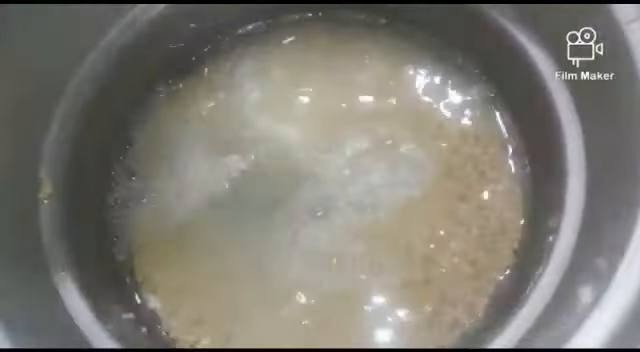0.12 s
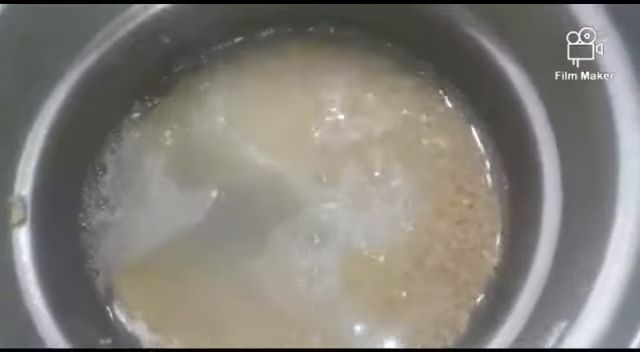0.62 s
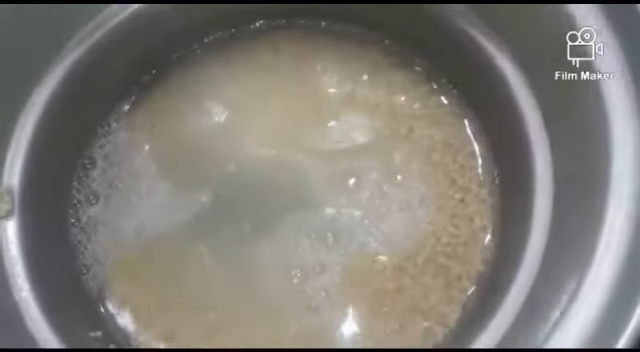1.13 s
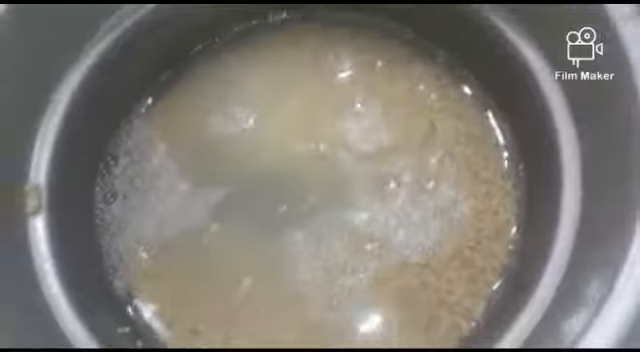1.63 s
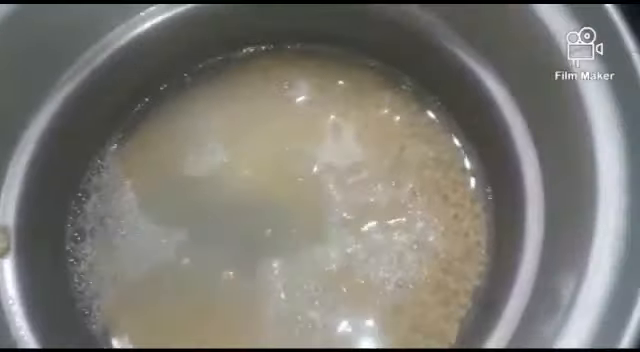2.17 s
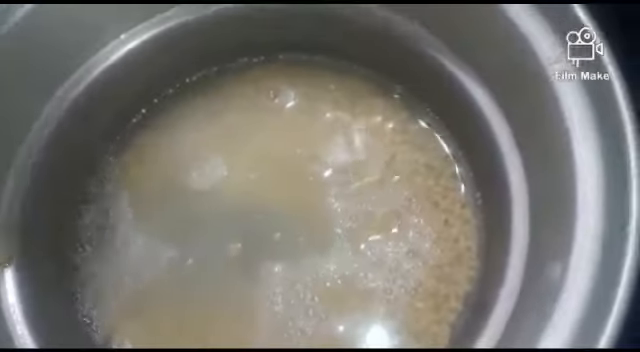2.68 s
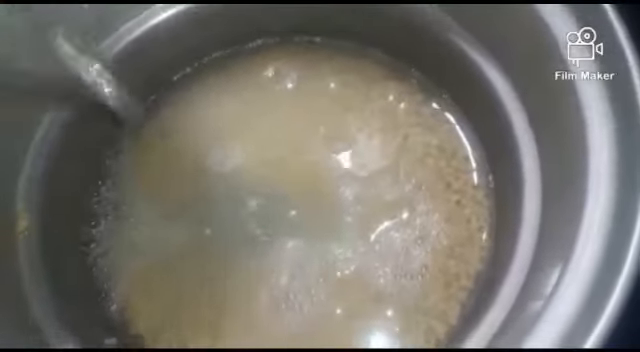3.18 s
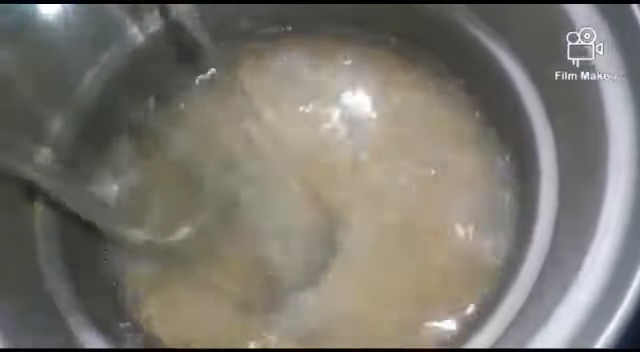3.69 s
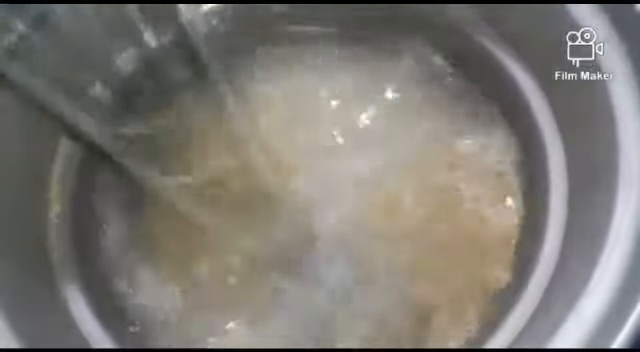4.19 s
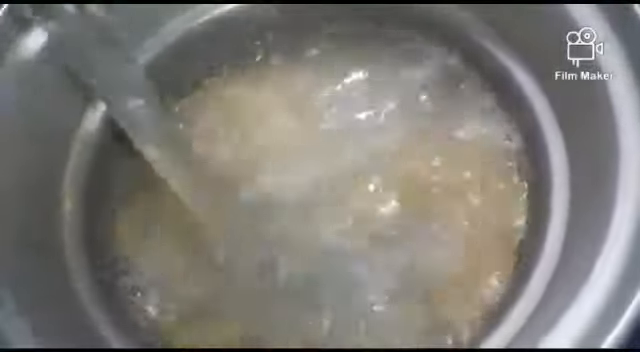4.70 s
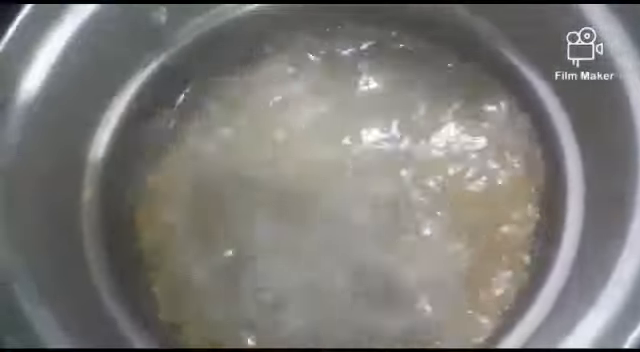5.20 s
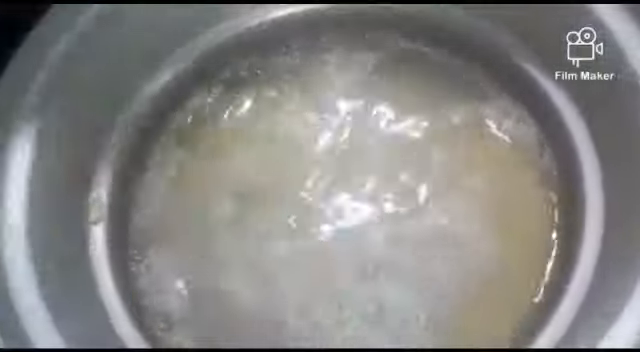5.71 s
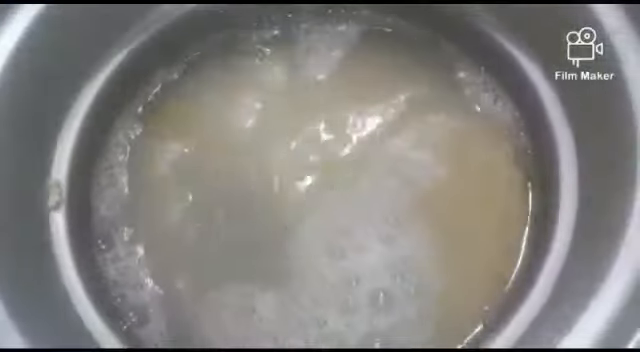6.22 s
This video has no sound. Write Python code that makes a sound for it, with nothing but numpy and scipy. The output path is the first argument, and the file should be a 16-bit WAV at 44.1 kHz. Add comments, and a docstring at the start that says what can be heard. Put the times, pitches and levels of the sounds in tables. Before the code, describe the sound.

A close microphone hears a steel pot of soaking lentils in a small, slightly reverberant kitchen. From 0 s there is only faint, high foam ticking over a soft low room hum. At about 0.8 s a steel ladle clanks very loudly on the pot, two blows almost together, a weaker one, another clear clank at 1.0 and a faint touch at 1.1, ringing briefly. Around 1.9-2.05 s a steel jug scrapes grittily over the counter, then knocks down loudly at 2.18 with a wavering ring; faint taps follow near 2.5. Near quiet until 3.35 s, when water pours into the pot: bright, dense splashing with hollow gurgles and a humming pot wall. It thins around 4.35-4.5, strengthens again, and ends in deep glugs and splashes near 5.25. Last droplets fade by 5.4, a small drip plops at 5.45, and slightly livelier foam fizzes until 6.3 s.

```python
"""Foam ticks over a low room hum in a kitchen, then a steel ladle clanks on a steel pot of soaking lentils.
A steel jug scrapes over the counter and is knocked down; its water is poured into the pot.
Metal is a set of decaying sine modes plus a noise clatter; the scrape is shaped noise and tiny grains.
The pour is shaped noise, damped-sine bubbles and noise bursts, with the pot wall humming along.
One last drip falls, and the foam ticks on."""
import sys
import numpy as np
from scipy import signal
from scipy.fft import rfft, irfft, next_fast_len
from scipy.io import wavfile
from scipy.ndimage import uniform_filter1d, map_coordinates

SR = 44100
rng = np.random.default_rng(int(sys.argv[2]) if len(sys.argv) > 2 else 0)


def wav_out(sig):
    """Save sig, one row per channel (or a flat mono array), as 16-bit PCM at SR to the path in sys.argv[1]."""
    wavfile.write(sys.argv[1], SR, np.round(np.clip(np.atleast_2d(sig).T, -1, 1) * 32767).astype(np.int16))


def convert_level_to_amplitude(level_db):
    """Map a level in decibels to its linear amplitude factor."""
    exponent = np.asarray(level_db, float) / 20
    return 10 ** exponent


N = 279594  # length [samples]

# Foam and room over time: (time [s], foam level [dB], hum level [dB])
FOAM_AND_HUM = [(0, -59.5, -59.5), (.8, -64.5, -62.5), (1.3, -58.5, -59), (1.8, -61, -61.5),
                (2.7, -67.5, -60), (3.3, -70.5, -62), (5.4, -51, -56), (5.7, -55.5, -58), (6.34, -55, -59)]
# Colour of the foam: (frequency [Hz], density [dB/Hz])
FOAM_COLOUR = [(880, -47.5), (1500, -24.5), (1900, -19), (2290, -9), (2470, -13), (3100, -14.5),
               (3730, -7.5), (4910, -2.5), (5970, -1), (6650, -3.5), (8330, -29.5), (10900, -16),
               (15600, -19)]
# Individually placed foam cells bursting: (time [s], level [dB], pitch [Hz])
FOAM_POPS = [(.6709, -37.5, 6190), (5.5587, -31, 5740), (5.6824, -34, 5280), (6.0491, -37, 6070)]
# Colour of the room hum: (frequency [Hz], density [dB/Hz])
HUM_COLOUR = [(13, -43), (22, -42.5), (76, 1.5), (109, -1.5), (179, 2.5), (216, -9.5), (288, -1.5),
              (319, -1), (408, -1), (838, -13), (1240, -17.5), (1430, -21.5), (3000, -28.5), (3900, -41.5),
              (6600, -120)]
# Kitchen reverb: (frequency [Hz], decay t60 [s])
KITCHEN_DECAY = [(150, 0.89), (1000, 0.57), (5000, 0.36), (12000, 0.3)]
# Partials of the last drip: (time [s], frequency [Hz], level [dB], decay t60 [s])
DRIP_PARTIALS = [(5.4545, 1150, -37, .06), (5.4545, 1440, -41, .22), (5.4545, 1750, -50, .05),
                 (5.4545, 2450, -43, .03), (5.505, 1440, -45, .1)]
# Jug sliding on the counter: (time [s], scrape level [dB], rumble level [dB])
DRAG_LEVELS = [(1.85, -60, -84), (1.89, -52, -46.5), (1.96, -34.5, -51.5), (1.986, -41.5, -43.5),
               (2.022, -52.5, -52.5), (2.074, -52.5, -65), (2.082, -45.5, -54)]
# Colour of the scrape: (frequency [Hz], density [dB/Hz])
SCRAPE_COLOUR = [(1290, -49), (2200, -15.5), (3200, -5.5), (5220, 1.5), (7150, -0.5), (7840, -32.5),
                 (8510, -19), (15100, -17.5), (16000, -17)]
# Colour of the sliding jug's body: (frequency [Hz], density [dB/Hz])
JUG_BODY_COLOUR = [(220, 2.5), (350, -3), (430, 7.5), (520, -1.5), (1000, -12), (1400, -10), (1800, -24)]
# Ladle on pot: (time [s], level [dB], share reaching the low modes [dB], clatter t60 [s])
LADLE_BLOWS = [(.822, 1, 3.5, 0.11), (.858, -2, 1, 0.086), (.887, -15, 6.5, 0.059), (1.0018, -9, 3, 0.064),
               (1.108, -27, -11, 0.038)]
# Ringing modes of the pot: (frequency [Hz])
POT_MODE_HZ = [139, 311, 600, 763, 809, 910, 1037, 1346, 1416, 1637, 1846, 2616, 3218, 3521, 3607, 3962,
               4368, 4549, 4880, 5040, 5444, 5841, 5950, 6148, 6535, 6794, 6960]
# The same modes: (level [dB], free decay t60 [s])
POT_MODES = [(-11.5, 0.65), (-8.5, .15), (-16, .2), (-19, 0.21), (5.5, 0.089), (-17, 0.29), (1.5, 0.3),
             (-9, .4), (-3.5, 0.83), (-16, 0.76), (-9, 0.17), (-2.5, 0.36), (-4, 0.2), (-5.5, .35),
             (-8, .3), (-15, .4), (-2, .16), (-5.5, .25), (-16.5, 0.27), (-14.5, .4), (-2, 0.58), (-17, .3),
             (-2.5, .25), (-17.5, .3), (-4.5, .2), (-12.5, .2), (-10.5, .25)]
# Dense pot modes under a blow: (frequency [Hz], density [dB/Hz])
POT_CLATTER = [(47, -54.5), (80, -20), (573, -10.5), (684, -25.5), (798, -4), (891, -17.5), (1040, -3.5),
               (1190, -32.5), (1810, -22), (2360, -30), (3510, -15), (5230, -10), (6670, -11), (8140, -39),
               (15800, -30)]
# Jug on counter: (time [s], level [dB], share reaching the low modes [dB], clatter t60 [s])
JUG_KNOCKS = [(1.877, -42.5, -5, .04), (2.056, -44, -13.5, 0.053), (2.0851, -24.5, -29, 0.09),
              (2.158, -26.5, -11.5, 0.051), (2.1648, -28, -2, 0.076), (2.1791, -2, -2.5, 0.16),
              (2.4809, -32.5, 3, 0.053), (2.5276, -35.5, 0, 0.045), (2.553, -41.5, 3, .05)]
# Ringing modes of the jug: (frequency [Hz])
JUG_MODE_HZ = [118, 156, 350, 362, 639, 644, 904, 1340, 1396, 2019, 2068, 2830, 2993, 3429, 3661, 3989,
               4517, 4705, 4926, 5071, 5390, 5577, 5868, 6126, 6234, 6508, 7262]
# The same modes: (level [dB], free decay t60 [s])
JUG_MODES = [(1.5, 0.24), (-7.5, 0.68), (-10, 0.56), (-11, 0.8), (-21, 1.68), (-22, 1.8), (-7.5, 0.17),
             (2.5, 0.4), (3.5, 0.38), (-9.5, 0.4), (-6.5, .3), (-9.5, 0.11), (-15.5, 0.17), (-12, 0.28),
             (-14.5, .24), (-14, 0.45), (-11, .4), (-14, .4), (-4, 0.068), (-12, .3), (-15.5, 0.26),
             (-20.5, 0.22), (-7.5, 0.15), (0, 0.72), (-17, 0.63), (-10, 0.24), (-33.5, 0.13)]
# Dense jug modes under a blow: (frequency [Hz], density [dB/Hz])
JUG_RATTLE = [(47, -50.5), (88, -27), (127, -3.5), (654, -10), (891, -3.5), (1190, -13.5), (1390, -4.5),
              (1730, -23), (2020, -9.5), (2410, -21), (2750, -12.5), (5230, -7.5), (6520, -8.5),
              (8890, -37), (15800, -24)]
# Low modes of the pot wall, drifting as the water loads it:
# (frequency as the stream lands [Hz], width [Hz], level [dB], drift [Hz/s], growth [dB/s])
WALL_MODES = [(143, 21, -28.5, -0.5, 6), (365, 15.7, -12, -38, -2), (608, 16, -9.5, -72, -1)]
# The stream: (time [s], splash level [dB], gurgle level [dB])
POUR_LEVELS = [(3.33, -100, -89), (3.41, -26, -47), (3.5, -26, -36), (3.66, -24, -52), (3.72, -24.5, -40),
               (4.14, -24.5, -36), (4.22, -26, -41.5), (4.34, -31, -52.5), (4.47, -32.5, -54.5),
               (4.52, -27, -36.5), (4.7, -29.5, -39.5), (4.94, -28, -35), (5.05, -28, -31),
               (5.22, -28.5, -37), (5.26, -32.5, -29), (5.33, -47, -44.5), (5.46, -53, -75)]
# Colour of the splash: (frequency [Hz], density [dB/Hz])
SPLASH_COLOUR = [(530, -34.5), (900, -16), (1130, -11.5), (1510, -7), (2140, -9), (4520, -2), (6110, 3),
                 (6560, 2), (8050, -25.5), (8870, -22.5), (11400, -14), (13400, -25), (15200, -16),
                 (16000, -25.5)]
# Colour of the gurgle: (frequency [Hz], density [dB/Hz])
GURGLE_COLOUR = [(53, -38), (90, -25), (201, -10), (309, -0.5), (390, -11), (583, 2), (796, -6.5),
                 (1130, -9), (2000, -17), (2600, -29), (4400, -120)]
# Resonances of the filling pot: (frequency [Hz], width [Hz], level [dB])
POT_RESONANCES = [(454, 18, -4), (1184, 130, 2.5), (2075, 290, -6), (2790, 110, -6.5), (3400, 120, -16.5)]
# Individually placed splashes: (time [s], level [dB], pitch [Hz])
SPLASH_DROPS = [(3.3632, -40.5, 6300), (3.4037, -16.5, 6230), (3.6606, -13, 4030), (3.7795, -12, 5800),
                (3.7828, -6, 5100), (3.786, -9.5, 3030), (3.9509, -16.5, 5000), (3.9719, -10, 5500),
                (4.0706, -9.5, 5940), (4.5027, -11, 3400), (4.6019, -13, 5900), (4.8858, -10.5, 3560),
                (5.1048, -11.5, 6480), (5.2407, -8.5, 3570), (5.241, -8.5, 2492), (5.2769, -11.5, 3740),
                (5.2944, -8.5, 6170), (5.3085, -18.5, 5540), (5.3298, -12.5, 4350), (5.3645, -22, 4220),
                (5.39, -28.5, 4600)]
# Individually placed large bubbles: (time [s], level [dB], pitch [Hz])
LARGE_BUBBLES = [(3.503, -40, 584), (4.128, -15.5, 1250), (4.19, -14.5, 1090), (4.855, -21, 604),
                 (4.549, -24.5, 1160), (4.938, -26, 642), (5.011, -18, 1157), (5.166, -24, 463),
                 (5.034, -17.5, 458), (5.034, -17, 307.5), (5.11, -16.5, 1144), (5.243, -21.5, 292),
                 (5.244, -8, 629)]
# Individually placed spray bursts: (time [s], level [dB])
SPRAY_BURSTS = [(3.3401, -45), (3.3898, -31), (3.4177, -23), (3.7048, -21), (4.1305, -19.5),
                (4.5103, -23.5), (5.2123, -18), (5.2599, -11.5), (5.2946, -10.5)]
# Colour of a drop bursting: (frequency [Hz], density [dB/Hz])
BURST_COLOUR = [(2500, -42), (3800, -5), (6300, -5.5), (8000, -19.5), (11000, 1), (15000, 2), (16400, -10)]

STREAM_START_S, STREAM_END_S = 3.41, 5.24  # random splashes and bubbles lie between these


def unit(x):
    """Scale to rms 1."""
    return x / np.sqrt(np.mean(x ** 2) + 1e-20)


def along(points, hz):
    """Read (frequency, value) points on a log frequency axis."""
    f, value = np.transpose(points)
    return np.interp(np.log(hz + 1), np.log(f + 1), value)


def gains(rows):
    """One gain per sample for each dB column; -120 dB outside the table."""
    s, *columns = np.transpose(rows)
    t = np.arange(N) / SR
    return [convert_level_to_amplitude(np.interp(t, s, db, left=-120, right=-120)) for db in columns]


def wobble(rate):
    """A smooth random curve, rate knots a second."""
    knots = rng.standard_normal(int(N * rate / SR) + 4)
    return map_coordinates(knots, [np.arange(N) * rate / SR])


def filtered(x, response):
    """Filter x by a complex response of frequency."""
    m = next_fast_len(len(x) + SR // 4)
    return irfft(rfft(x, m) * response(np.fft.rfftfreq(m, 1 / SR)), m)[:len(x)]


def coloured(x, spectrum):
    """Shape x by a spectrum, rms 1."""
    return unit(filtered(x, lambda hz: convert_level_to_amplitude(along(spectrum, hz))))


def patchy(x, depth_db):
    """Random gain in time-frequency patches of about 700 Hz by 25 ms."""
    z = signal.stft(x, nperseg=256)[2]
    field = uniform_filter1d(rng.standard_normal(z.shape), size=4, axis=0)
    field = uniform_filter1d(field, size=8, axis=1)
    return signal.istft(z * convert_level_to_amplitude(depth_db * unit(field)), nperseg=256)[1][:N]


def kitchen_tail():
    """One second of reverb: noise whose frequencies die at their own speeds, energy 1."""
    hz, t, z = signal.stft(rng.standard_normal(SR), SR, nperseg=256)
    decay = convert_level_to_amplitude(-60 * t / along(KITCHEN_DECAY, hz)[:, None])
    tail = signal.istft(z * decay, SR, nperseg=256)[1][:SR]
    return tail / np.linalg.norm(tail)


def bubbles(s, gain, hz, cycles, rise):
    """Damped sines with a climbing pitch, as of bubbles nearing the surface."""
    k = np.arange(int(4 * cycles * SR / np.min(hz)))[None]
    u = k * hz[:, None] / (SR * cycles)  # age in decay times
    envelope = gain[:, None] * np.exp(-u) * (1 - np.exp(-8 * u))
    wave = envelope * np.sin(2 * np.pi * cycles * (u + rise * u * u / 2))
    place = (s * SR).astype(int)[:, None] + k
    return np.bincount(place.ravel(), wave.ravel(), 2 * N)[:N]


def swarm(count, hz, spread, cycles, scatter_db):
    """Damped sines at random times, pitches log-normal and levels uneven; rms 1."""
    s = rng.random(count) * N / SR
    pitch = hz * np.exp(spread * np.clip(rng.standard_normal(count), -2, 2))
    gain = convert_level_to_amplitude(scatter_db * np.minimum(rng.exponential(1, count), 3.5))
    return unit(bubbles(s, gain, pitch, cycles, rise=0.0039))


def bursts(s, db, t60, spectrum):
    """A short decaying puff of fresh noise at each time."""
    k = np.arange(600)
    puff = rng.standard_normal((len(s), len(k))) * convert_level_to_amplitude(db[:, None] - 60 * k / SR / t60)
    place = (s * SR).astype(int)[:, None] + k
    train = np.bincount(place.ravel(), puff.ravel(), N)
    return filtered(train, lambda f: convert_level_to_amplitude(along(spectrum, f)))


def with_random(rows, count, span, level, over_db, hz=None, spread=0):
    """Columns of the placed events, joined by random ones whose size follows a level."""
    u, z = rng.random(count), np.clip(rng.standard_normal((count, 2)), -2, 2)
    s = span[0] + (span[1] - span[0]) * (np.arange(count) + u) / count
    db = 20 * np.log10(level[(s * SR).astype(int)]) + over_db + 5.5 * z[:, 0]
    more = [s, db]
    if hz:
        more.append(hz * np.exp(spread * z[:, 1]))
    return np.hstack([np.transpose(rows), more])


def stillness():
    """Foam cells burst with tiny ticks; the room hums below."""
    foam, hum = gains(FOAM_AND_HUM)
    tick_gain = convert_level_to_amplitude(5 * rng.exponential(1, N).clip(0, 3))
    ticks = np.where(rng.random(N) < 250 / SR, tick_gain, 0)  # about 250 a second
    fizz = coloured(rng.standard_normal(N) * convert_level_to_amplitude(1.9 * wobble(25)), FOAM_COLOUR)
    fizz = fizz + .35 * coloured(ticks, FOAM_COLOUR)
    s, db, hz = with_random(FOAM_POPS, count=90, span=(0, N / SR - .1), level=foam,
                            over_db=14.5, hz=5900, spread=.08)
    pops = bubbles(s, convert_level_to_amplitude(db), hz, cycles=6, rise=.01)
    room = hum * convert_level_to_amplitude(0.88 * wobble(7.1)) * coloured(rng.standard_normal(N), HUM_COLOUR)
    return foam * fizz + pops + room


def drip():
    """A last drop from the lip falls into the pot: decaying sines and a noise plop."""
    s, hz, db, t60 = np.transpose(DRIP_PARTIALS)[:, :, None]
    t = np.maximum(np.arange(N) / SR - s, 0)
    partials = convert_level_to_amplitude(db - 60 * t / t60) * np.sin(2 * np.pi * hz * t)
    dry = np.sum(partials, 0) * convert_level_to_amplitude(3 * wobble(90))
    plop_colour = [(700, -44), (1100, 0), (1600, 3.0), (2600, -6.5), (5000, -27)]  # (Hz, dB/Hz)
    plop = coloured(rng.standard_normal(N), plop_colour)
    dry = dry + plop * (t[0] > 0) * convert_level_to_amplitude(-39 - 60 * t[0] / 0.12)
    return dry + convert_level_to_amplitude(-15) * signal.fftconvolve(dry, kitchen_tail())[:N]


def drag():
    """The jug's foot grinds over the counter in fine uneven grit."""
    scrape, rumble = gains(DRAG_LEVELS)
    fine_slips = rng.standard_normal(N) * convert_level_to_amplitude(3 * wobble(190))
    slow_slips = rng.standard_normal(N) * convert_level_to_amplitude(3 * wobble(37))
    grit = swarm(count=2500, hz=5000, spread=0.14, cycles=8, scatter_db=-3.0)
    grind = unit(coloured(fine_slips, SCRAPE_COLOUR) + 0.29 * grit)
    body = coloured(slow_slips, [(100, -63)] + JUG_BODY_COLOUR + [(3000, -120)])
    return scrape * grind + rumble * body


def struck(blows, mode_hz, modes, dense, ring_db, clatter_db, wet_db, slosh_db):
    """Each blow rings the modes at new strengths over a short clatter; the kitchen answers."""
    out, t, hz = np.zeros(N + 2 * SR), np.arange(SR) / SR, np.array(mode_hz)[:, None]
    level, t60 = np.transpose(modes)[:, :, None]
    # the low modes take a moment to build up
    swell = 1 - np.exp(-t / np.where(hz < 2800, .012, .0004))
    for s, db, low_db, clatter_t60 in blows:
        tilt = lambda f: np.interp(f, [1900, 2300], [low_db, 0])
        strength = level + ring_db + tilt(hz) + 0.28 * rng.standard_normal(hz.shape)
        # a lingering contact damps the upper modes
        held = np.where(hz > 1000, np.minimum(t60, 1.4 * clatter_t60), t60)
        # moving water makes each ring waver
        slosh = slosh_db * signal.resample(rng.standard_normal((len(hz), 40)), SR, axis=1)
        envelope = convert_level_to_amplitude(strength + slosh - 60 * t / held) * swell
        ring = np.sum(envelope * np.sin(2 * np.pi * hz * t), 0)
        hiss = filtered(coloured(rng.standard_normal(SR), dense), lambda f: convert_level_to_amplitude(tilt(f)))
        crack = filtered(hiss, lambda f: f / (f + 2500)) * convert_level_to_amplitude(-60 * t / 0.033)
        clatter = hiss * convert_level_to_amplitude(-60 * t / clatter_t60) + 0.53 * crack
        dry = ring + convert_level_to_amplitude(clatter_db) * clatter
        late_tail = np.pad(kitchen_tail(), (250, 0))  # pre-delay [samples]
        wet = signal.fftconvolve(dry, late_tail)[:SR]
        fade = np.minimum(1, 10 - 10 * t)
        out[round(s * SR):][:SR] += convert_level_to_amplitude(db) * (dry + convert_level_to_amplitude(wet_db) * wet) * fade
    return out[:N]


def jug_knocks():
    """The steel jug knocks down on the counter, its ring wavering with the water inside."""
    return struck(JUG_KNOCKS, JUG_MODE_HZ, JUG_MODES, JUG_RATTLE,
                  ring_db=-16.5, clatter_db=-7, wet_db=-5.0, slosh_db=3.5)


def ladle_clanks():
    """The steel ladle sets the modes of the pot ringing."""
    return struck(LADLE_BLOWS, POT_MODE_HZ, POT_MODES, POT_CLATTER,
                  ring_db=-18.5, clatter_db=-12.5, wet_db=-5.0, slosh_db=1.0)


def wall_mode(centre_hz, width_hz, drift):
    """A drifting narrow band: two slow noises on a sine and a cosine, rms 1."""
    t = np.arange(N) / SR - STREAM_START_S
    phase = 2 * np.pi * (centre_hz * t + drift * t * t / 2)
    lowpass = lambda f: 1 / (1 + (2 * f / width_hz) ** 2)
    slow = [filtered(rng.standard_normal(N), lowpass) for _ in range(2)]
    return unit(slow[0] * np.sin(phase) + slow[1] * np.cos(phase))


def wall():
    """The turbulent flow keeps the pot's low modes humming, each wavering on its own."""
    gurgle, t = gains(POUR_LEVELS)[1], np.arange(N) / SR - STREAM_START_S
    # the wall takes on 0.62 of the gurgle's swing in dB, and fades out with the faintest flow
    drive = gurgle.max() * (gurgle / gurgle.max()) ** .62
    drive = drive * np.minimum(1, gurgle / 2e-3)
    hum = np.zeros(N)
    for hz, width_hz, db, drift, grow_db in WALL_MODES:
        hum += convert_level_to_amplitude(db + grow_db * t + 3.6 * wobble(7.8)) * wall_mode(hz, width_hz, drift)
    return drive * hum


def pot_response(f):
    """A direct path plus the resonances of the filling pot."""
    response = 0.64
    for centre, width, db in POT_RESONANCES:
        band = 1j * f * width
        response = response + convert_level_to_amplitude(db) * band / (centre ** 2 - f * f + band)
    return response


def pour():
    """The stream tears into spray and drags air under; the pot's resonances colour both."""
    splash, gurgle = gains(POUR_LEVELS)
    span = STREAM_START_S, STREAM_END_S

    flutter = convert_level_to_amplitude(1.9 * wobble(35) + 2.4 * wobble(150))
    spray = coloured(patchy(rng.standard_normal(N) * flutter, depth_db=2.5), SPLASH_COLOUR)
    spray = spray + .5 * swarm(count=9000, hz=4140, spread=.3, cycles=2.1, scatter_db=6.0)
    spray = spray + 0.53 * swarm(count=4500, hz=3604, spread=.34, cycles=10.6, scatter_db=1.0)
    churn = coloured(rng.standard_normal(N) * convert_level_to_amplitude(3.8 * wobble(18)), GURGLE_COLOUR)
    churn = churn + 0.28 * swarm(count=600, hz=744.5, spread=.4, cycles=6.0, scatter_db=8.0)
    flow = splash * unit(filtered(spray, pot_response))
    flow = flow + gurgle * unit(filtered(churn, pot_response))

    s, db, hz = with_random(SPLASH_DROPS, count=22, span=span, level=splash,
                            over_db=8, hz=4530, spread=.35)
    drops = bubbles(s, convert_level_to_amplitude(db), hz, cycles=8, rise=.004)
    crowns = bursts(s, db, 0.012, SPLASH_COLOUR)  # the crown of each splash
    s, db = with_random(SPRAY_BURSTS, count=36, span=span, level=splash, over_db=-1.5)
    snaps = bursts(s, db, .011, BURST_COLOUR)
    s, db, hz = with_random(LARGE_BUBBLES, count=24, span=span, level=splash,
                            over_db=-1.5, hz=1170, spread=.09)
    glugs = bubbles(s, convert_level_to_amplitude(db), hz, cycles=6.1, rise=0.0069)

    dry = flow + drops + crowns + snaps + glugs
    to_room = dry - .6 * glugs  # bubbles deep in the pot reach the walls less
    return dry + convert_level_to_amplitude(-10) * signal.fftconvolve(to_room, kitchen_tail())[:N]


def scene():
    """All sources at one microphone; the small vessels radiate little deep bass."""
    vessels = ladle_clanks() + jug_knocks() + drag() + pour() + drip()
    near = filtered(vessels, lambda hz: (1j * hz / (105 + 1j * hz)) ** 4)
    return (near + wall() + stillness())[None]


def low_pass(x):
    """Removes everything above the highest recorded frequency."""
    return signal.sosfilt(signal.butter(12, 16970, fs=SR, output="sos"), x)


def record(dry):
    """The loudest peaks are softly limited and the treble is cut above 15.9 kHz."""
    soft = dry[0] / (1 + np.abs(dry[0] / 0.88) ** 6) ** (1 / 6)
    mix = filtered(soft, lambda hz: hz < 15900)[None]
    return low_pass(mix)


dry = scene()
out = record(dry)
wav_out(out)
```